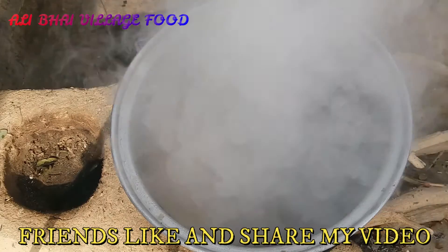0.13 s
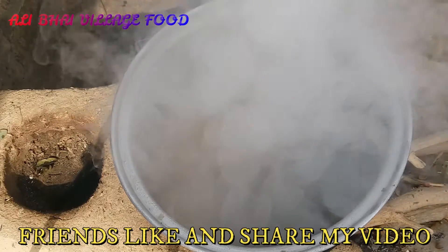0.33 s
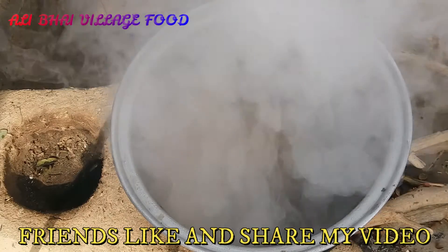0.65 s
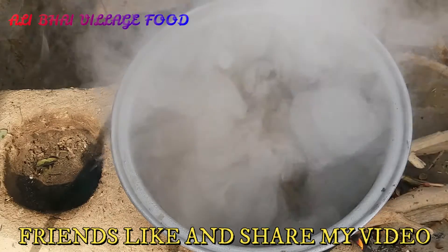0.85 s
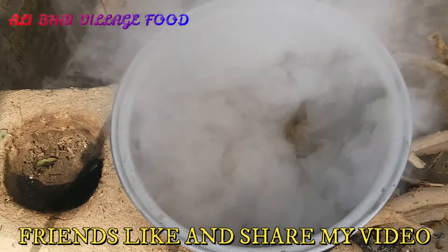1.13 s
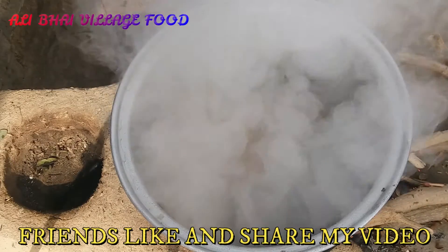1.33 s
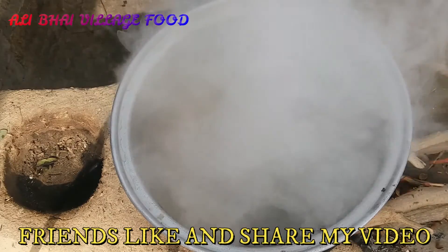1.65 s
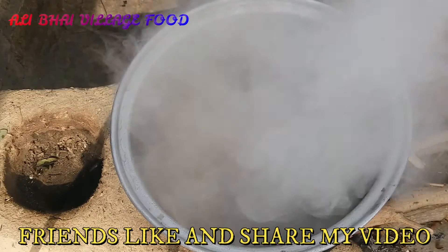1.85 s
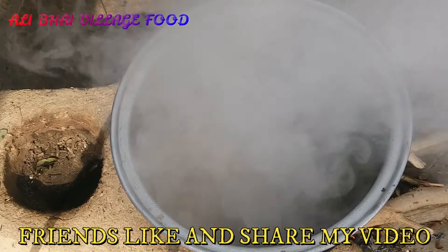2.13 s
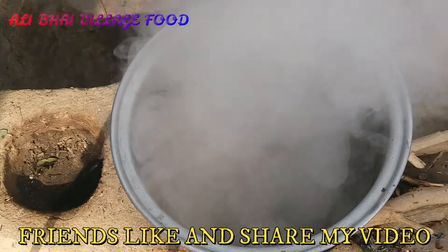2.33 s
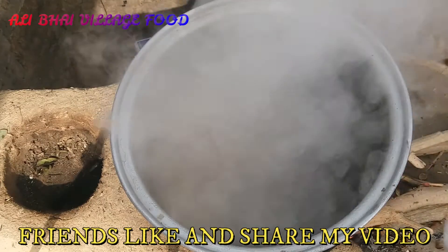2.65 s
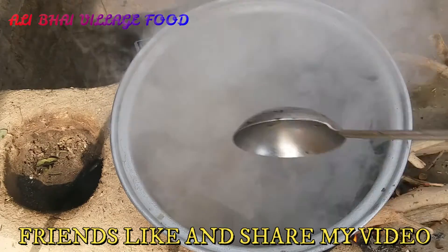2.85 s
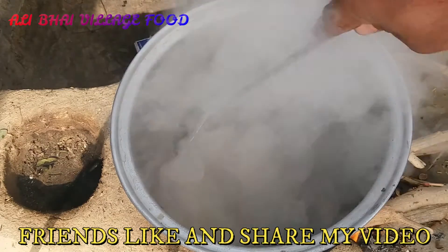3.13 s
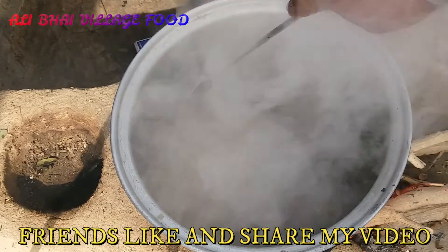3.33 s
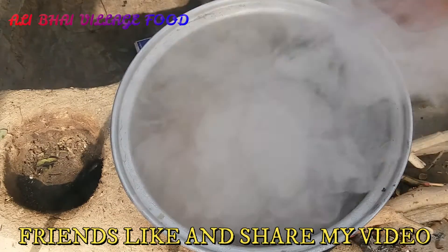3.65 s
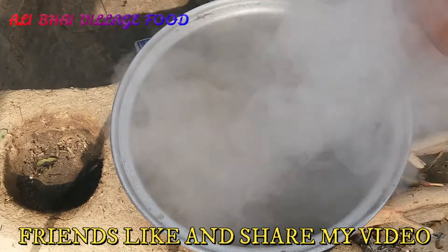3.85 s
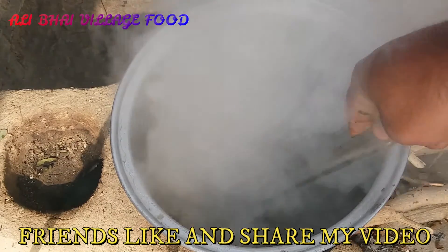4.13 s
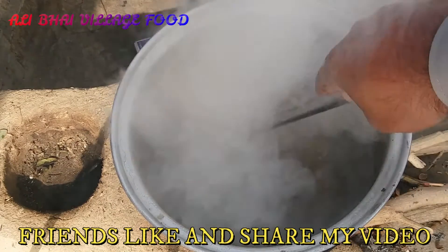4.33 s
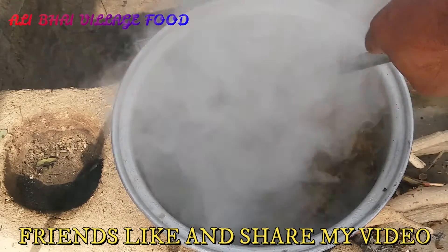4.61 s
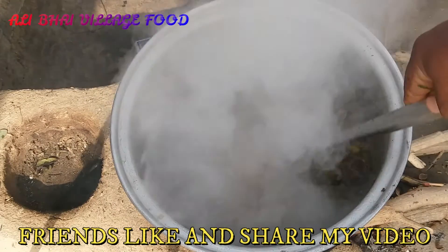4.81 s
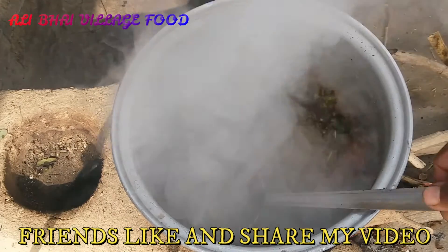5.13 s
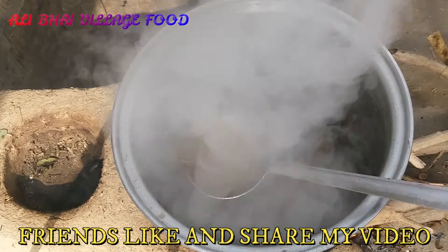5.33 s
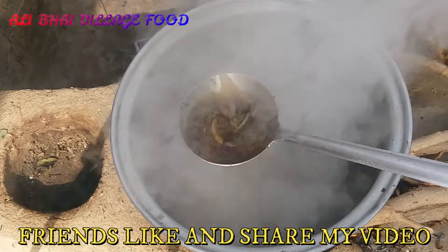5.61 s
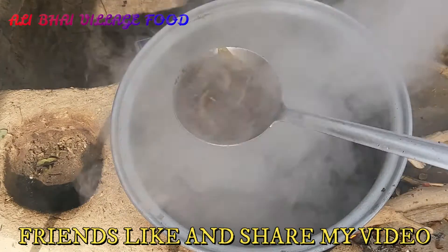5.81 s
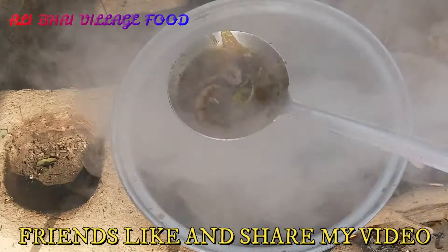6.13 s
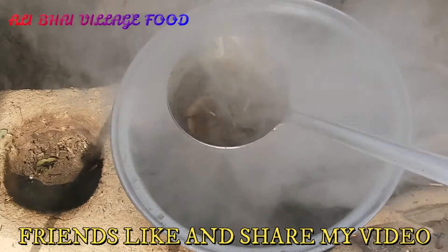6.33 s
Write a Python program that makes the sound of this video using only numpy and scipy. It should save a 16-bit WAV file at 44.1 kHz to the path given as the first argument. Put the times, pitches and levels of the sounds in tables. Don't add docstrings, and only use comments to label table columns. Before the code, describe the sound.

In a small village yard with short wall reflections, a pot simmers and hisses continuously, its boil dipping early then recovering. Wood snaps dryly. Two fluttering, rasping crow calls come about a second apart, around bright ladle ticks, dull pot knocks and gritty metal scrapes. A far goat moans softly. After a last hard scrape, drops slap and patter, then a closer goat bleats shakily. The microphone is near the pot.

```python
import sys
import numpy as np
from scipy import signal
from scipy.fft import rfft, irfft, next_fast_len
from scipy.io import wavfile
from scipy.ndimage import uniform_filter1d, map_coordinates

SR = 44100
rng = np.random.default_rng(int(sys.argv[2]) if len(sys.argv) > 2 else 0)


def boost(x):
    u = np.asarray(x, float) / 20
    return 10 ** u


def output_pcm(signal):
    pcm = np.clip(np.atleast_2d(signal).T, -1, 1) * 32767
    wavfile.write(sys.argv[1], SR, np.round(pcm).astype(np.int16))


N = 285568

STIR_S, LIFT_S = 3.35, 4.93


def unit(x):
    return x / np.sqrt(np.mean(x ** 2) + 1e-20)


def along(points, hz):
    f, v = np.transpose(points)
    return np.interp(np.log(hz + 1), np.log(f + 1), v)


def curves(rows):
    s, *cols = np.transpose(rows)
    return [np.interp(np.arange(N) / SR, s, c) for c in cols]


def during(rows, fade=.015):
    start, end = rows[0][0], rows[-1][0]
    return np.interp(np.arange(N) / SR, [start - fade, start, end, end + fade], [0, 1, 1, 0])


def swell(start, end, db, attack, release, arch_db):
    return [(start - attack, db - 25.0), (start, db - arch_db), ((start + end) / 2, db),
            (end, db - arch_db), (end + release, db - 21.0)]


def step(s):
    return np.clip((np.arange(N) / SR - s) / 0.015, 0, 1)


def wobble(rate):
    return map_coordinates(rng.standard_normal(int(N * rate / SR) + 4), [np.arange(N) * rate / SR])


def filtered(x, response):
    m = next_fast_len(N + SR // 2)
    return irfft(rfft(x, m) * response(np.fft.rfftfreq(m, 1 / SR)), m)[..., :N]


def resonant(x, modes, low_hz):
    def response(f):
        peaks = 0
        for k, (centre, width, db) in enumerate(modes):
            damping = 1j * f * width
            peaks = peaks + (-1) ** k * boost(db) * damping / (centre * centre - f * f + damping)
        return peaks / (1 + (low_hz / (f + 1)) ** 6)
    return filtered(x, response)


def patchy(x, patchy_db, size):
    z = signal.stft(x, nperseg=512)[2]
    field = rng.standard_normal(z.shape[1:])
    field = uniform_filter1d(uniform_filter1d(field, size[0], 0), size[1], 1)
    return signal.istft(z * boost(patchy_db * unit(field)), nperseg=512)[1][:, :N]


# (frequency [Hz], time to fall 60 dB [s])
YARD_RING = [(200, .16), (2000, .2), (10000, .08)]


def yard(x, wet_db, lag_ms):
    hz, t, z = signal.stft(rng.standard_normal((2, SR // 2)), SR, nperseg=256)
    tail = signal.istft(z * boost(-60 * t / along(YARD_RING, hz)[:, None]), SR, nperseg=256)[1]
    tail = tail / np.linalg.norm(tail[0])
    wet = signal.fftconvolve(np.pad(x, (300, 0))[None], tail, axes=1)[:, :N]
    sides = np.array([[1], [-1]])
    direct = filtered(x, lambda f: np.exp(-1j * np.pi * f * lag_ms / 1000 * sides))
    return direct + boost(wet_db) * wet


def voice(pitch_hz, level, throat, low_hz, rasp, jitter, flutter_hz=0, swing=0, throb=0, clear=18):
    flutter = 2 * np.pi * np.cumsum(flutter_hz * (1 + jitter * wobble(40.87))) / SR
    phase = 2 * np.pi * np.cumsum(pitch_hz * (1 + jitter * wobble(90))) / SR + swing * np.sin(flutter)
    count = np.arange(1, int(8000 / pitch_hz.max()))
    sounding = during(level) > 0
    pulses = np.zeros(N)
    for k in count:
        pulses[sounding] += np.cos(k * phase[sounding]) / (1 + (k / clear) ** 4)
    pulses *= np.sqrt(2 / len(count))
    breath = rng.standard_normal(N) * (1 + np.cos(phase))
    source = (pulses + rasp * breath) * (1 + throb * np.cos(flutter + 2.15)) * during(level)
    sound = resonant(source, throat, low_hz)
    return sound / np.std(sound[sounding]) * boost(curves(level)[0])


# (frequency [Hz], likeness [0-1])
PORT_LIKENESS = [(60, 1), (150, 0.98), (380, 0.84), (950, 0.52), (2380, 0.33), (5980, 0.35), (15000, 0.21)]


def rush(spectrum, patchy_db, lumps=1):
    pair = patchy(rng.standard_normal((2, N)) * lumps, patchy_db, size=(6, 8))

    def spread(hz):
        turn = np.arccos(np.clip(along(PORT_LIKENESS, hz), -1, 1)) / 2
        return boost(along(spectrum, hz)) * [np.cos(turn), np.sin(turn)]
    mid, side = filtered(pair, spread)
    return unit(np.array([mid + side, mid - side]))


# (time [s], strength [dB])
BOIL_STRENGTH = [(0, -58.5), (.12, -62.5), (.49, -68), (.83, -68), (1.03, -65.5), (1.24, -60.5),
                 (1.42, -60.5), (2.1, -58), (2.92, -58.5), (4.3, -57.5), (4.95, -57.5), (5.4, -60),
                 (5.7, -59.5), (6.48, -58.5)]
# (frequency [Hz], level per Hz [dB])
RUMBLE_COLOUR = [(15, -90), (25, -60), (40, -14), (86, 5), (118, -3.5), (151, -1), (292, -25.5), (400, -26),
                 (520, -68), (880, -120)]
SIMMER_COLOUR = [(120, -33), (200, -1), (293, -0.5), (389, 0.5), (842, -8), (1130, -5.5), (2500, -6),
                 (3250, -14.5), (5500, -120)]
STEAM_COLOUR = [(710, -9.5), (1200, -9.5), (1350, -39), (1750, -17), (3000, -6), (5860, 0), (7750, -9),
                (8450, -15.5), (10400, -21.5), (10700, -20), (14300, -15), (15800, -15.5)]


def boil():
    strength_db, = curves(BOIL_STRENGTH)
    lifted = step(LIFT_S)
    stirred = step(STIR_S) - lifted
    rumble_db = 10 + 2.5 * lifted + 0.29 * wobble(2.97)
    rumble = boost(rumble_db) * rush(RUMBLE_COLOUR, patchy_db=-0.4, lumps=boost(0.83 * wobble(9.1)))
    simmer = boost(6 + 5.5 * stirred) * rush(SIMMER_COLOUR, patchy_db=1.7, lumps=boost(1.8 * wobble(60)))
    puffs = boost(0.6 * wobble(40) + 1.5 * wobble(400))
    steam = boost(13 - 3.5 * lifted) * rush(STEAM_COLOUR, patchy_db=1, lumps=puffs)
    return boost(strength_db) * (rumble + simmer + steam)


CAW_ATTACK_S, CAW_RELEASE_S = .045, .045


def partials(pitch_hz, flutter_hz, lines, caw, gain_db):
    level = swell(caw[0], caw[1], gain_db, CAW_ATTACK_S, CAW_RELEASE_S, arch_db=10)
    sounding, out = during(level) > 0, np.zeros(N)
    rates = np.array([pitch_hz, flutter_hz])[:, sounding]
    pitch, flutter = 2 * np.pi * np.cumsum(rates, axis=1) / SR
    for k, m, db in lines:
        waver_db = 2.5 * np.roll(wobble(35), rng.integers(N))[sounding]
        tone = np.cos(k * pitch + m * flutter + rng.uniform(0, 2 * np.pi))
        out[sounding] += np.sqrt(2) * boost(db + waver_db) * tone
    return out * boost(uniform_filter1d(curves(level)[0], size=2000)) * during(level)


# (start [s], end [s], peak level [dB])
CAW_TIMES = [
    (3.053, 3.327, -29),
    (4.079, 4.386, -30.5),
]
# (time [s], pitch [Hz], flutter rate [Hz])
CAW_ONE_PITCH = [(3.0, 375, 75), (3.05, 380, 76), (3.09, 385, 77), (3.14, 400, 80), (3.18, 404.5, 80.9),
                 (3.23, 402.5, 80.5), (3.29, 391.5, 78.3), (3.39, 372.5, 74.5)]
CAW_TWO_PITCH = [(4.03, 415, 74), (4.1, 425, 73), (4.16, 439, 72), (4.2, 445, 72), (4.245, 460, 72),
                 (4.29, 452, 72), (4.34, 440, 71), (4.43, 422, 70)]
# (frequency [Hz], width [Hz], level [dB])
CAW_ONE_BEAK = [(790, 170, -14), (1234, 150, -14.5), (1810, 170, -3.5), (2000, 63, -2.5), (2160, 130, -5),
                (2660, 160, -9.5), (2950, 160, -10), (4570, 540, 3.5), (5670, 900, 2), (7160, 640, -7),
                (8200, 1000, -29)]
CAW_TWO_BEAK = [(800, 65, -14.5), (1380, 120, -8.5), (1690, 160, -5), (1950, 79, -0.5), (2130, 93, -4),
                (2380, 130, -6), (3140, 75, -4), (4620, 470, 0.5), (5400, 500, 2), (6780, 330, 1),
                (7840, 730, -9)]
# (multiple of pitch, plus multiple of flutter, level [dB])
CAW_ONE_TONES = [(2, -1, -50), (2, 0, -47), (3, -1, -53), (3, 0, -51), (3, 2, -50), (4, 1, -37),
                 (4, 2, -29.5), (5, -1, -35), (5, 1, -38), (5, 2, -46), (6, -2, -46), (6, 1, -48),
                 (7, -2, -49), (7, 2, -47)]
CAW_TWO_TONES = [(2, -1, -54), (2, 1, -53), (3, -2, -52), (3, -1, -48), (3, 1, -45), (4, -1, -44),
                 (4, 1, -34), (5, -2, -45), (5, 1, -43), (7, 0, -52)]


def crow():
    one_hz, one_flutter = curves(CAW_ONE_PITCH)
    two_hz, two_flutter = curves(CAW_TWO_PITCH)
    first, second = (swell(*caw, CAW_ATTACK_S, CAW_RELEASE_S, arch_db=2) for caw in CAW_TIMES)
    one = voice(one_hz, first, CAW_ONE_BEAK, 620, rasp=.5, jitter=.003,
                flutter_hz=one_flutter, swing=.5, throb=.35, clear=9)
    two = voice(two_hz, second, CAW_TWO_BEAK, 640, rasp=.3, jitter=.002,
                flutter_hz=two_flutter, swing=.46, throb=.5, clear=11)
    caws = patchy((one + two)[None], patchy_db=1, size=(3, 6))[0]
    tones = partials(one_hz, one_flutter, CAW_ONE_TONES, CAW_TIMES[0], gain_db=-1.5)
    tones = tones + partials(two_hz, two_flutter, CAW_TWO_TONES, CAW_TIMES[1], gain_db=1)
    return yard(boost(2) * caws, wet_db=-5, lag_ms=.1) + yard(tones, wet_db=-13, lag_ms=.1)


# (time [s], strongest partial [Hz], level [dB])
FAR_MOAN = [(4.24, 573.3, -76), (4.274, 634, -59), (4.39, 626, -51), (4.458, 621, -50.5), (4.55, 602, -53),
            (4.602, 593, -54), (4.66, 584, -76)]


def far_goat():
    throat = [(310, 80, -9), (615, 90, 0), (930, 120, -9)]
    level = [row[::2] for row in FAR_MOAN]
    moan = voice(curves(FAR_MOAN)[0] / 2, level, throat, 250, rasp=.3, jitter=.012)
    return yard(moan, wet_db=-4, lag_ms=.1)


BLEAT_S, BLEAT_HZ, BLEAT_DB, HESITANT_DB = 5.978, 316.2, -35.5, -6
CLIMB_S, DROP_S = .028, .016
# (time of top [s], top pitch [Hz], held [s], drop [Hz])
BLEAT_QUAVERS = [
    (6.082, 382, .02, 52),
    (6.172, 396, .035, 26),
    (6.262, 404, .016, 10),
    (6.33, 396, .012, 30),
    (6.412, 432, .016, 62),
    (6.5, 400, 0, 50),
]


def quaver():
    rows = [(BLEAT_S, BLEAT_HZ)]
    for s, hz, held, drop in BLEAT_QUAVERS:
        last_s, last_hz = rows[-1]
        rows += [(max(s - CLIMB_S, last_s), last_hz), (s, hz)]
        rows += [(s + held, hz), (s + held + DROP_S, hz - drop)]
    return rows


# (frequency [Hz], width [Hz], level [dB])
GOAT_MOUTH = [(707, 112, 6), (1210, 61, 3), (1735, 140, -7), (2440, 170, -4), (2775, 110, 3.5),
              (3200, 210, 3), (3890, 320, 0.5), (4380, 220, 5), (5400, 550, -13)]
# (time [s], gain [dB])
BLEAT_EFFORT = [(5.98, 1.5), (6.04, -3.5), (6.08, 1.5), (6.14, -1), (6.2, -1.5), (6.275, 4), (6.31, -2),
                (6.335, -1), (6.37, -0.5), (6.48, 0)]


def near_goat():
    pitch_hz = uniform_filter1d(curves(quaver())[0], size=200)
    first, soft_db = BLEAT_QUAVERS[0][0], BLEAT_DB + HESITANT_DB
    level = [(BLEAT_S, soft_db), (first - CLIMB_S, soft_db), (first, BLEAT_DB), (N / SR, BLEAT_DB)]
    bleat = voice(pitch_hz, level, GOAT_MOUTH, 560, rasp=.3, jitter=.009)
    upper = filtered(bleat, lambda f: 1 / (1 + (1500 / (f + 1)) ** 8))
    bleat = bleat + upper * (boost(curves(BLEAT_EFFORT)[0]) - 1)
    fall = np.maximum(-np.gradient(pitch_hz), 0) * SR / 1000
    fall = uniform_filter1d(fall, size=400)
    breaking = boost(-2.5 * np.roll(fall, 350) + .9 * wobble(60))
    bleat = patchy((bleat * breaking)[None], patchy_db=1.6, size=(3, 4))[0]
    late = boost(-11) * np.roll(bleat, round(.035 * SR)) * during(level)
    return yard(bleat, wet_db=-6.5, lag_ms=.385) + late


# (frequency [Hz], level per Hz [dB])
SNAP_COLOUR = [(400, -29), (900, -11), (2000, -0.5), (3000, 3.5), (5300, 5.5), (7500, 0.5), (9000, -11),
               (12000, -9.5), (15800, -12)]


def snaps(events):
    out, t = np.zeros((2, N + 4096)), np.arange(4096) / SR
    f = np.fft.rfftfreq(8192, 1 / SR) + 1
    sides = np.array([[.5], [-.5]])
    for s, db, hz, broad in events:
        t60 = .03 + .0005 * (db + 30)
        decay = boost(-60 * t / t60) + boost(-60 * t / .006)
        narrow = np.exp(-(np.log2(f / hz) / (0.26 * (5000 / hz) ** 0.17)) ** 2)
        colour = np.clip(broad, 0, 1) * boost(along(SNAP_COLOUR, f)) + narrow
        noise = rng.standard_normal(8192) + 1.61 * rng.standard_normal((2, 8192))
        burst = irfft(rfft(noise) * colour)[:, :4096] * decay * (1 - np.exp(-t / .00008))
        pan_db = 4 * rng.uniform(-1.0, 1)
        burst = boost(db) * burst / np.abs(burst).max() * boost(sides * pan_db)
        out[:, round((s + .0007) * SR):][:, :4096] += burst
    return out[:, :N]


# (time [s], peak level [dB], centre [Hz],
# broadness [0-1])
FIRE_CRACKS = [(0.032, -26, 5040, 0), (0.2637, -21, 2430, 0.8), (0.265, -35.5, 900, 0.03),
               (.4589, -39, 5570, .4), (0.5293, -39, 4630, 0.7), (0.7004, -39, 9000, 0.9),
               (1.042, -28.5, 5730, 1), (1.504, -25, 6100, 0.4), (1.5868, -31.5, 6040, 0),
               (1.7622, -19, 4900, 0.13), (1.766, -19, 8700, 0.64), (2.078, -33, 600, 0.07),
               (2.09, -27.5, 1070, 0), (2.105, -39, 800, .1), (2.2318, -25.5, 5670, 0.03),
               (2.239, -31, 1250, 0.04), (2.569, -27, 3880, 0.9), (2.609, -36.5, 2030, 0),
               (2.699, -39, 6080, .6), (2.818, -26, 5900, 0.8), (2.8387, -25.5, 1950, 0.4),
               (2.8515, -21.5, 5400, 0.5), (2.909, -39, 1090, 0.04)]


def firewood():
    return snaps(FIRE_CRACKS)


# (time [s], peak level [dB], centre [Hz], broadness [0-1])
LADLE_DRIPS = [(5.0369, -31, 2660, 0.12), (5.0432, -30, 800, 0.2), (5.0878, -39, 5870, .4),
               (5.17, -31, 880, 0.08), (5.189, -29, 5300, 0.6), (5.243, -24.5, 1450, 0.18),
               (5.293, -27, 5940, 0.1), (5.324, -29, 4730, 0.3), (5.3625, -28, 4830, 0.8),
               (5.3883, -21, 4770, 0.37), (5.395, -24.5, 5960, 0.14), (5.411, -25.5, 5460, 0.3),
               (5.43, -34, 1400, 0.8), (5.448, -25, 6160, 0.7), (5.4763, -24.5, 700, 0.6),
               (5.474, -40, 13200, .02), (5.482, -37, 4300, 0.2), (5.502, -29.5, 1500, 0.4),
               (5.5273, -33.5, 2200, 0.4), (5.543, -25, 884, 0.13), (5.5598, -26, 3800, 0.3),
               (5.5827, -26, 6440, 0.2), (5.594, -31, 2000, 0.23), (5.617, -30, 700, 0.05),
               (5.627, -28.5, 800, 0.05), (5.654, -30, 4470, 0.1), (5.7623, -34, 2480, 0.35),
               (5.855, -36, 800, 0.2), (5.951, -35, 3420, 0), (5.999, -30, 6700, 0.8),
               (6.265, -35, 6470, .4), (6.428, -39, 7500, 0.3)]


def drips():
    return snaps(LADLE_DRIPS)


# (time [s], peak level [dB], centre [Hz], broadness [0-1])
RIM_TICKS = [(3.4089, -2.5, 5400, 0.3), (3.409, -14, 3140, 0.3), (3.467, -38, 6100, 0.6),
             (3.5341, -26.5, 1020, 0.25), (3.681, -18.5, 4710, 0.7), (3.69, -28, 2600, 0.1),
             (3.824, -26.5, 1430, 0.01), (3.887, -26, 890, 0), (3.967, -18, 3060, 0.05),
             (3.991, -14, 5050, .3), (4.2074, -15, 4800, 0.6), (4.968, -33, 870, 0)]


def ticks():
    return snaps(RIM_TICKS)


# (start [s], end [s], peak level [dB], attack [s], pot boom [dB])
LADLE_STROKES = [
    (3.715, 3.893, -31.5, 0.13, -11.5),
    (3.905, 3.98, -32.5, 0.0077, -15),
    (4.356, 4.476, -34, 0.18, -11.5),
    (4.468, 4.745, -40.5, 0.031, -13),
    (4.761, 4.821, -37, 0.019, -9),
    (4.808, 4.933, -27, 0.063, -21.5),
    (5.66, 5.713, -64, .03, 10.5),
]
# (frequency [Hz], width [Hz], level [dB])
LADLE_MODES = [(2080, 510, -7.5), (3736, 215, -1.5), (4330, 300, 1.5), (4880, 330, 2.5), (5410, 260, 2.5),
               (6100, 320, 4.5), (6590, 290, 3.5), (7500, 710, -5), (9040, 1600, -14), (14000, 3500, -17.5)]
POT_MODES = [(297, 58, -17), (457, 310, 1.5), (970, 240, 1.5), (1500, 69, 1)]


def scrape():
    shapes = [swell(start, end, db, attack, release=0.018, arch_db=4)
              for start, end, db, attack, _ in LADLE_STROKES]
    gains = np.array([boost(curves(shape)[0]) * during(shape) for shape in shapes])
    boom_gain = boost(np.array(LADLE_STROKES)[:, -1]) @ gains
    slips = rng.standard_normal((2, N)) * boost(1.25 * wobble(70) + 0.89 * wobble(600))
    edge = patchy(slips[:1], patchy_db=3.5, size=(3, 3))[0]
    edge = unit(resonant(edge, LADLE_MODES, low_hz=1500)) * gains.sum(0)
    boom = unit(resonant(slips[1], POT_MODES, low_hz=180)) * boom_gain
    hum = swell(LIFT_S + 0.047, LIFT_S + 0.11, -51, .02, 0.053, 2)
    handle = unit(resonant(slips[1], [(1870, 150, 0)], low_hz=1500)) * boost(curves(hum)[0]) * during(hum)
    last_hard = gains[-2] / gains[-2].max()
    sing = boost(-40) * unit(resonant(slips[1], [(934, 131, 0)], low_hz=700)) * last_hard
    return yard(edge + boom + handle + sing, wet_db=-6.5, lag_ms=0.027)


# (time [s], peak level [dB], time to fall 60 dB [s], favoured pitch [Hz])
LADLE_KNOCKS = [(2.073, -39.5, 0.065, 162), (3.409, -20, 0.06, 340), (3.417, -21, 0.096, 458),
                (3.532, -24.5, 0.082, 210), (3.988, -17, 0.075, 580), (4.206, -32.5, 0.081, 972),
                (4.461, -28.5, 0.061, 348), (5.544, -54, 0.046, 223), (5.617, -27, 0.014, 182),
                (5.627, -31, 0.026, 260), (5.688, -37.5, 0.036, 161), (5.999, -25, 0.033, 230)]
# (frequency [Hz], level [dB], share of the knock's ring time)
POT_WALL = [(177.7, -0.5, 1.6), (265, -6.5, 1.7), (317.4, 5.5, 0.86), (465.6, 7, 0.66), (651, 8, 0.37),
            (977, 3, 0.45), (1320, -17, 0.41)]


def knocks():
    out, t = np.zeros(N + SR), np.arange(SR // 4) / SR
    for s, db, t60, centre_hz in LADLE_KNOCKS:
        ring = np.zeros(len(t))
        for hz, level, share in POT_WALL:
            tone_db = level - 6.3 * abs(np.log2(hz / centre_hz)) + rng.normal(0, 2.3)
            tone = np.sin(2 * np.pi * hz * rng.normal(1, 0.03) * t)
            ring += boost(tone_db - 60 * t / (t60 * share)) * tone
        ring = ring * (1 - np.exp(-t / 0.003))
        out[round(s * SR):][:len(t)] += boost(db) * ring / np.abs(ring).max()
    return yard(out[:N], wet_db=-17.5, lag_ms=0.024)


def scene():
    animals = crow() + far_goat() + near_goat()
    ladle = drips() + ticks() + scrape() + knocks()
    return boil() + animals + firewood() + ladle


def top_cut(x):
    return signal.sosfilt(signal.butter(12, 16990, fs=SR, output="sos"), x)


# (frequency [Hz], left minus right [dB])
PORT_COLOUR = [(60, 3.5), (110, -0.5), (200, 3.5), (380, -3.5), (700, 1.5), (1290, 0.5), (2380, -1.5),
               (4400, 3.5), (8120, 2.0), (15000, 2.5)]


def record(dry):
    top_hz, sides = 15980, np.array([[.5], [-.5]])

    def response(hz):
        colour_db = along(PORT_COLOUR, hz) * sides - 23 * (hz > top_hz)
        return boost(colour_db) * (hz < top_hz + 1000) / (1 + (36 / (hz + 1)) ** 4)
    return top_cut(filtered(dry, response))


dry = scene()
out = record(dry)
output_pcm(out)
```